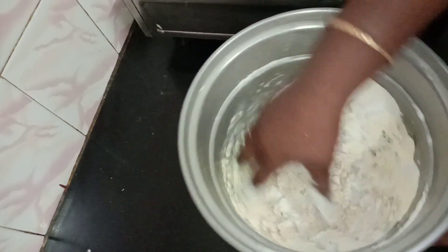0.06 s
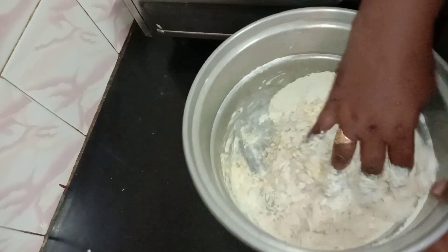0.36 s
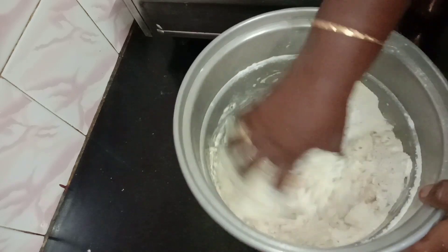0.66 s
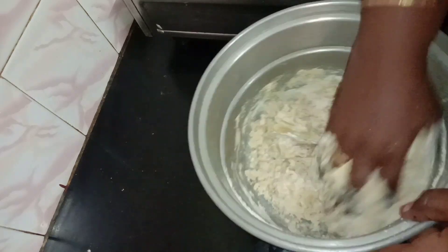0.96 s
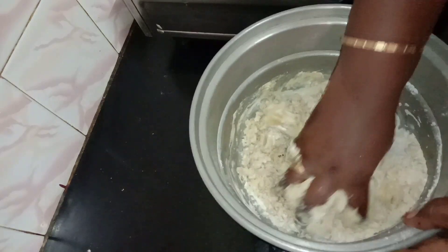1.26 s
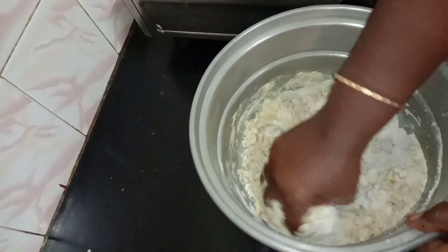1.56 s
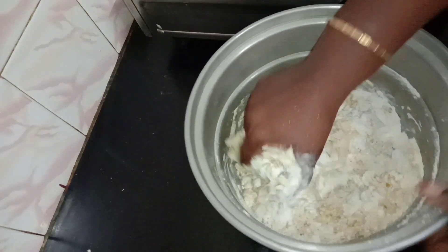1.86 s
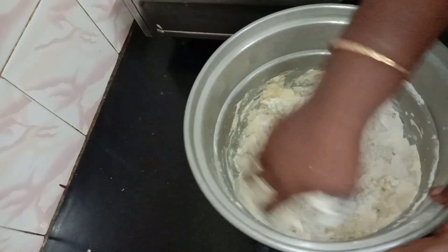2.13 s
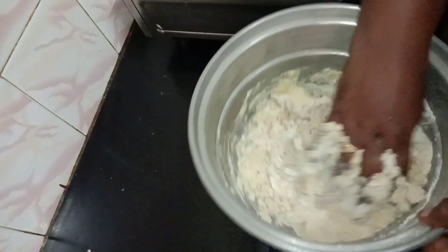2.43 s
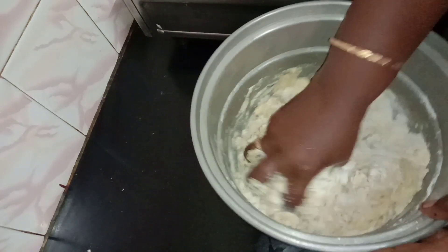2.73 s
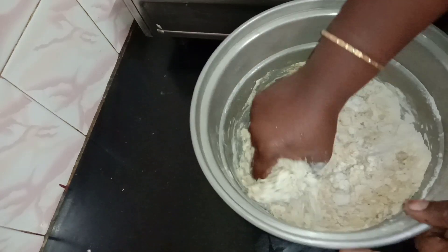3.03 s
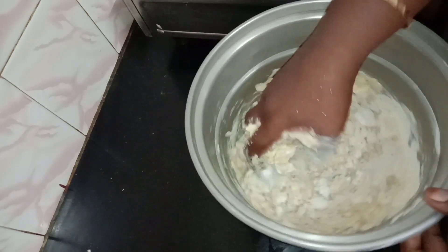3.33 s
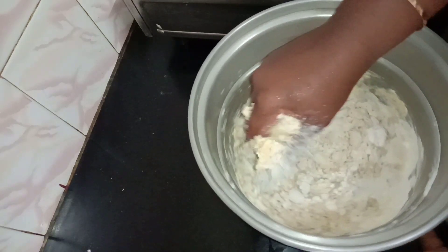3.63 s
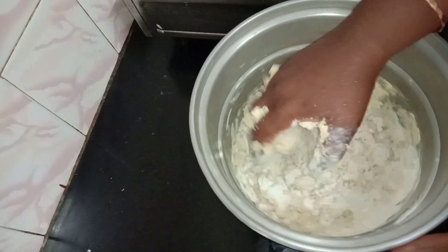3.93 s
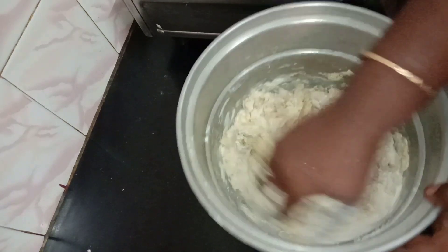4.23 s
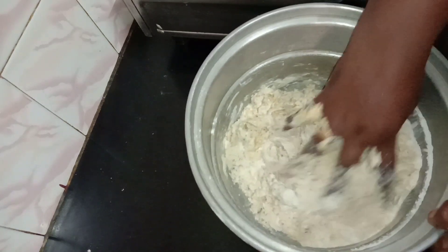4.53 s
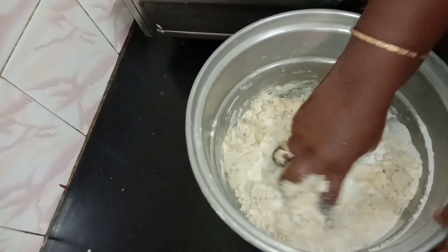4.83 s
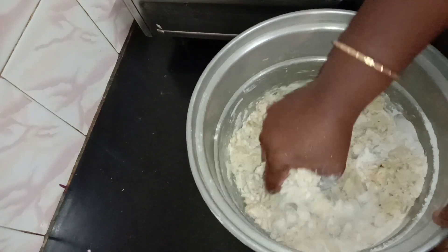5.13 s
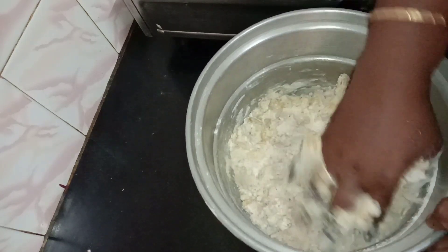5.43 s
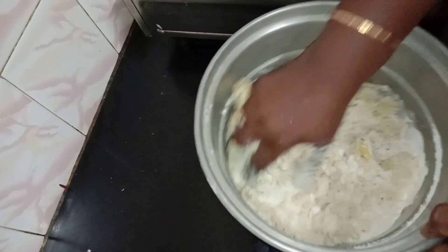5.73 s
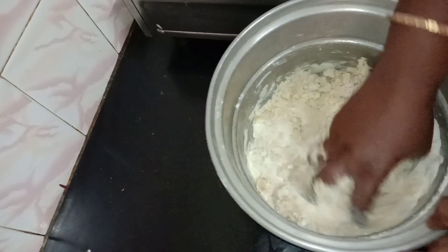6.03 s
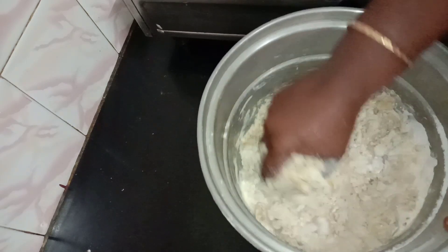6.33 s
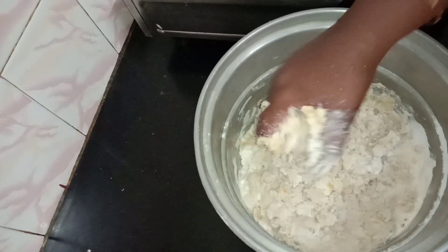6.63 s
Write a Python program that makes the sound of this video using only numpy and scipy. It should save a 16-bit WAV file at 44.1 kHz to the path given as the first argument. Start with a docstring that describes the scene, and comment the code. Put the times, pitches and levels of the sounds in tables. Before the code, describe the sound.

A hand rubs damp flour around a metal pot in gritty swishes, the pot knocking and sliding on a stone counter.

```python
"""A tiled kitchen: a hand rubs damp flour round a wide aluminium pot on a stone counter.
Each stroke drags grains over the metal in a swish, a scrape and a powdery fizz. The pot rings as it
slides and knocks on the stone, crumbs and fingernails tick on its wall, and the palm thumps the dough.
Near the end a bangle clinks on the rim. All is close and in mono, over a low hum and a faint hiss;
about a second in, the sound cuts out for a moment."""
import sys
import numpy as np
from scipy import signal
from scipy.fft import rfft, irfft
from scipy.io import wavfile
from scipy.ndimage import uniform_filter1d

SR = 44100
rng = np.random.default_rng(int(sys.argv[2]) if len(sys.argv) > 2 else 0)


def waveform_to_disk(signal):
    """Save audio, clipped to [-1, 1], as 16-bit WAV at the path in sys.argv[1]."""
    frames = np.transpose(np.atleast_2d(signal))
    scaled = np.clip(frames, -1, 1) * 32767
    samples = np.round(scaled).astype(np.int16)
    wavfile.write(sys.argv[1], SR, samples)


N = 299076

# The ring of the pot. Each row: frequency in Hz, relative level in dB, t60 in seconds.
POT_MODES = [(131, -20, 0.27), (267, -21, 0.076), (326, -11, 0.087), (384, -2, 0.11), (443, -0.5, 0.085),
             (521.2, -3.5, 0.068), (623.8, -2, 0.079), (754, -8, 0.064), (1107, -5.5, 0.037),
             (1228, -4, 0.024), (1406, -8.5, 0.044), (1637, -8.5, 0.074), (1854, -8, 0.12),
             (2105, -9, 0.059), (2468, -2, 0.042), (2748, 3, 0.035), (3400, -2, 0.037), (3720, -6, 0.016),
             (4460, -8.5, 0.066), (6115, -6.5, 0.033), (6700, -33, 0.031), (7210, -11.5, 0.025)]
# The gritty noise of a hard contact. Each row: frequency in Hz, relative level in dB.
GRIT_SPECTRUM = [(200, -25), (800, 0), (2500, 3), (5000, 2), (7500, 0), (9000, -12.5), (12000, -19.5),
                 (15500, -32)]


def amp(db):
    """Decibels to gain."""
    return 10 ** (np.asarray(db) / 20)


def unit(x):
    """Scales to rms 1."""
    return x / np.sqrt(np.mean(x ** 2) + 1e-20)


def curve_at(points, hz):
    """Joins (Hz, value) points by straight lines over log frequency."""
    f, value = np.transpose(points)
    return np.interp(np.log(hz + 1), np.log(f + 1), value)


def add(mix, start_s, sound):
    """Lays a sound into the mix."""
    part = mix[max(round(start_s * SR), 0):][:len(sound)]
    part += sound[:len(part)]


def equalise(x, spectrum):
    """Filters x by a curve of (Hz, dB) points."""
    hz = np.fft.rfftfreq(len(x), 1 / SR)
    return irfft(rfft(x) * amp(curve_at(spectrum, hz)), len(x))


def noise(samples, spectrum):
    """Coloured noise at rms 1."""
    return unit(equalise(rng.standard_normal(samples), spectrum))


def wander(rate_hz):
    """A random drift at rms 1, up to about the given rate."""
    hz = np.fft.rfftfreq(N, 1 / SR)
    return unit(irfft(rfft(rng.standard_normal(N)) / (1 + (hz / rate_hz) ** 2), N))


def grains(per_s, spread_db):
    """Tiny slips of random sign, a few much larger than the rest."""
    size = amp(spread_db * np.minimum(rng.exponential(1, N), 5))
    return unit(size * rng.choice([-1, 1], N) * (rng.random(N) < per_s / SR))


def ring(modes, t, rise_s, force=((1000, 0),)):
    """Decaying modes, each weighted by the force's (Hz, dB) curve, which is flat by default."""
    hz, db, t60 = np.transpose(modes)[:, :, None]
    waves = np.sin(2 * np.pi * (hz * t + rng.random(hz.shape)))
    envelopes = amp(db + curve_at(force, hz)) * np.exp(-np.log(1000) * t / t60)
    return (envelopes * waves).sum(0) * (1 - np.exp(-t / rise_s))


def resonate(slips, body):
    """Each slip sets off the body's ring, scaled to unit energy."""
    return signal.fftconvolve(slips, body / np.linalg.norm(body))[:N]


def hand_strokes():
    """Gains of swish, scrape and fizz: each stroke digs in, swells or eases, and dies away."""
    # Pushes of the hand. Each row: start in seconds, length in seconds, relative end level in dB,
    # swell over the push in dB, scrape offset in dB, powder offset in dB.
    strokes = [(0, 0.14, -38, -4, -9.5, -19), (0.229, 0.14, -43.5, 15, -2, -17),
               (0.44, 0.11, -41, 8.5, -13, -17), (0.58, 0.18, -34, 5.5, -2.5, -12),
               (1.08, 0.19, -43, 3.5, -5, -13), (1.265, 0.2, -39.5, 1, -3, -12.5),
               (1.77, 0.4, -58, -6, -15, -29), (2.071, 0.14, -46, -6, -10, -18),
               (2.222, 0.2, -40, -2, -10, -11), (2.474, 0.18, -41.5, 5, -11, -14),
               (2.62, 0.16, -38.5, 6.5, 0, -12), (4.02, 0.31, -48, 12, -6.5, -19),
               (4.255, 0.148, -31.2, 4.5, -11.2, -7.2), (4.64, 0.14, -44.8, 9.5, -7.5, -15.2),
               (4.78, 0.082, -38.2, 6.5, -3.4, -10.6), (4.98, 0.085, -57.5, -3, -1.5, -29),
               (5.422, 0.27, -31.5, 17.5, -18.5, -13.5), (5.715, 0.14, -49, -4, -4, -15),
               (5.95, 0.15, -40, -10, -3, -20)]
    # The fingers keep working between strokes: relative swish, scrape and fizz levels in dB.
    kneading_db = (-60, -67.5, -89.5)
    attack_s, release_db_per_s = 0.06, 108  # the fingers dig in; the flour settles
    powder_exponent = 1.45  # powder flies only while the hand is fast
    t = np.arange(N) / SR
    power = np.outer(amp(kneading_db) ** 2, np.ones(N))
    for start, length, db, swell_db, scrape_db, powder_db in strokes:
        age = np.maximum(t - start, 0)
        attack = np.sin(np.pi / 2 * np.minimum(age / attack_s, 1)) ** 2
        speed = attack * amp(-release_db_per_s * np.maximum(age - length, 0))
        push = amp(db + swell_db * (np.minimum(age / length, 1) - 1))
        layers = np.array([speed, amp(scrape_db) * speed, amp(powder_db) * speed ** powder_exponent])
        power += (push * layers) ** 2
    return np.sqrt(power)


def rubbing(swish_gain, scrape_gain, fizz_gain):
    """Flour grains slip under trembling finger pressure, and coarse ones ring the wall."""
    # The colours of swishing flour, the scrape on the bottom and dry powder.
    # Each row: frequency in Hz, relative level in dB.
    swish_spectrum = [(1500, -60.5), (3500, -13.5), (5200, 1), (6200, 1), (7600, 0.5), (8600, -6.5),
                      (10500, -25.5)]
    scrape_spectrum = [(120, -27.5), (450, -2), (750, -6), (980, -8.5), (1700, 4), (2900, 4.5), (4400, 6.5),
                       (6000, -3.5), (9000, -37)]
    fizz_spectrum = [(6000, -28), (8500, 2.5), (10000, 3), (12500, -0.5), (14000, -8.5), (15500, 2)]
    # The wall under the fingers. Each row: frequency in Hz, relative level in dB, t60 in seconds.
    wall_modes = [(1704, -6, 0.18), (2500, -0.5, 0.14), (2940, 5.5, 0.075), (3540, 0, 0.13),
                  (4120, 3.5, 0.13), (5700, -16.5, 0.0407)]
    tremble = amp(1.07 * wander(rate_hz=18))
    swish = unit(equalise(grains(per_s=12000, spread_db=1.0), swish_spectrum))
    scrape = unit(equalise(grains(per_s=5000, spread_db=2.6), scrape_spectrum))
    fizz = unit(equalise(grains(per_s=16000, spread_db=2.5), fizz_spectrum))
    flour = amp(-6.5) * swish_gain * swish + amp(-3.0) * scrape_gain * scrape + fizz_gain * fizz
    wall = ring(wall_modes, np.arange(SR // 5) / SR, rise_s=0.00036)
    coarse = amp(-22) * swish_gain * grains(per_s=160, spread_db=6.0)
    return tremble * crumble(flour, patchy_db=2.0) + resonate(coarse, wall)


def crumble(x, patchy_db):
    """Lumps break and re-form: the colour shifts in patches of some 30 ms by 400 Hz."""
    bands = signal.stft(x, SR, nperseg=512)[2]
    patches = uniform_filter1d(rng.standard_normal(bands.shape), size=5, axis=0)
    patches = uniform_filter1d(patches, size=5, axis=1)
    return signal.istft(bands * amp(patchy_db * unit(patches)), SR, nperseg=512)[1][:N]


def knocks():
    """Metal meets stone: grit chatters under the base and the pot rings. Soft landings build slower."""
    # The pot rocks onto the counter. Each row: start in seconds, relative levels of low thud,
    # middle clank and treble clack in dB, chatter time in seconds.
    landings = [(0.0313, -33, -18, -14, 0.0046), (0.0435, -47, -27, -22, 0.0019),
                (0.1883, -40, -38.5, -25.5, 0.003), (0.622, -75.5, -37, -21, 0.0029),
                (1.1352, -20, -23, -21.5, 0.0039), (1.1520, -24, -25.5, -62, 0.0046),
                (3.1677, -17, -22, -36.5, 0.0037), (3.186, -35, -30, -41, 0.012),
                (4.2426, -18, -13, -24.5, 0.0032), (4.2590, -16.5, -24.5, -32, 0.0094),
                (5.9321, -18.5, -17.5, -13.5, 0.0039), (5.9838, -24, -20.5, -14, 0.0041)]
    out, t = np.zeros(N), np.arange(SR // 3) / SR
    for start, thud_db, clank_db, clack_db, chatter_s in landings:
        force = [(620, thud_db), (1150, clank_db), (1700, clank_db - 6.5),
                 (2800, clank_db - 8.5), (6200, clack_db)]
        grit = equalise(noise(len(t), GRIT_SPECTRUM), force)
        age = t / chatter_s
        attack = 1 - np.exp(-age / 0.24)
        decay = np.exp(-age ** 2) + 0.34 * np.exp(-age / 4)
        modes = loaded_pot(detune=0.044, uneven_db=5.0)
        body = ring(modes, t, rise_s=0.11 * chatter_s, force=force)
        add(out, start, amp(-3.5) * grit * attack * decay + amp(-5.5) * body)
    return out


def loaded_pot(detune, uneven_db):
    """Hand and dough load the pot anew at each blow: its modes shift in pitch and strength."""
    hz, db, t60 = np.transpose(POT_MODES)
    shift, gain = rng.uniform(-1.34, 1, (2, len(hz)))
    return np.transpose([hz * (1 + detune * shift), db + uneven_db * gain, t60])


def sliding(push):
    """The base sticks and slips on the stone, and each slip sets the hollow pot ringing."""
    # Skids of the base. Each row: start in seconds, length in seconds, peak drive in dB.
    slides = [(0.471, 0.094, -45.5), (0.817, .15, -51.5), (1.192, 0.33, -49), (2.236, 0.12, -40.3),
              (4.334, 0.15, -51.5), (5.694, 0.092, -47.5), (5.943, 0.34, -44.5)]
    # How hard slips drive the pot. Each row: frequency in Hz, relative level in dB.
    slip_force = [(200, -16), (380, -6), (530, 2), (650, -1.5), (1250, 1.5), (2000, -13)]
    t = np.arange(N) / SR
    speed = amp(-20.5) * push  # every stroke also shakes the pot on its base
    for start, length, db in slides:
        speed += amp(db) * np.sin(np.pi * np.clip((t - start) / length, 0, 1))
    body = ring(POT_MODES, t[:SR // 5], rise_s=0.00042, force=slip_force)
    return resonate(speed * grains(per_s=350, spread_db=1.0), body)


def bangle_clink():
    """The bangle taps the rim, buzzes against it for a moment and rings brightly."""
    # The bangle's ring. Each row: frequency in Hz, relative level in dB, t60 in seconds.
    bangle_modes = [(956, -19.5, 0.12), (1600, -11, 0.054), (2315, -2.5, 0.078), (2480, -12, 0.039),
                    (3166, -20, 0.28), (4320, 3.5, 0.017), (5190, 11.5, 0.025), (5370, -5, 0.026),
                    (5800, -5, 0.032), (6080, -4, 0.028), (6260, -1.5, 0.039), (7230, -8, .04),
                    (7640, 1, 0.032), (7740, 1, .03), (9250, -14, .035), (10870, -12, 0.023),
                    (12600, -19, .015)]
    out, t = np.zeros(N), np.arange(SR // 3) / SR
    buzz = amp(-31) * noise(len(t), GRIT_SPECTRUM) * np.exp(-t / 0.0085)
    chime = amp(-26.5) * ring(bangle_modes, t, rise_s=0.00043)
    add(out, start_s=6.6138, sound=buzz + chime)
    return out


def wall_ticks():
    """Crumbs and fingernails hit the wall: a tiny click and one short ring each."""
    # Small hits. Each row: start in seconds, relative level in dB, pitch in Hz, t60 in seconds.
    ticks = [(0.5163, -35, 5530, 0.022), (2.4918, -33.5, 5970, 0.011), (2.9882, -46, 7300, 0.011),
             (3.954, -43.5, 6600, 0.014), (4.069, -47, 2485, 0.061), (4.146, -43, 5570, 0.024),
             (4.414, -31.5, 1994, 0.029), (4.7156, -43, 5860, 0.051), (5.138, -47, 6700, 0.011),
             (5.376, -51, 3046, 0.11)]
    out, t = np.zeros(N), np.arange(SR // 6) / SR
    for start, db, hz, t60 in ticks:
        click = noise(len(t), [(hz / 4, -20), (hz, 0), (hz * 2, -26), (hz * 4, -45)])
        tink = ring([(hz, db + 2.5, t60)], t, rise_s=0.0014)
        add(out, start, amp(db - 6.5) * click * np.exp(-t / 0.0049) + tink)
    return out


def low_thumps():
    """The palm on the dough, and at 4.244 s the bass of the pot knocking on the counter."""
    # Soft low thumps. Each row: start in seconds, relative level in dB, pitch in Hz.
    thumps = [(0.176, -33.5, 98), (3.265, -37.5, 108), (4.244, -34, 263), (4.27, -28.5, 94),
              (6.28, -44, 140.7)]
    out, t = np.zeros(N), np.arange(SR // 3) / SR
    peak_s = 0.015
    envelope = t / peak_s * np.exp(1 - t / peak_s)
    for start, db, hz in thumps:
        add(out, start, amp(db - 4.5) * envelope * np.sin(2 * np.pi * hz * t))
    return out


def kitchen_reverb(x):
    """Dense reflections from the tiles, each band dying at its own speed."""
    # The room's decay. Each row: frequency in Hz, t60 in seconds.
    decay_times = [(100, 1.67), (450, 0.6), (1200, 0.66), (3000, 0.56), (7000, 0.33), (14000, 0.45)]
    # The colour of the reflections. Each row: frequency in Hz, level in dB.
    wet_spectrum = [(50, -11.5), (100, -2), (450, -1.5), (1200, 0), (3000, -6.5), (7000, -7.5), (14000, -6)]
    hz, t, bands = signal.stft(unit(rng.standard_normal(SR)), SR, nperseg=256)
    decay_rate = np.log(1000) / curve_at(decay_times, hz)[:, None]
    envelopes = np.exp(-decay_rate * t) * np.sqrt(2 * decay_rate / SR)  # equal energy per band
    colour = amp(curve_at(wet_spectrum, hz))[:, None]
    tail = signal.istft(bands * envelopes * colour, SR, nperseg=256)[1][:SR]
    fade_in = np.clip(np.arange(SR) / SR / 0.0019, 0, 1)
    return signal.fftconvolve(x, tail * fade_in)[:N]


def room_noise():
    """A low wavering hum under a faint hiss."""
    # The two colours of the room tone. Each row: frequency in Hz, relative level in dB.
    hum_spectrum = [(25, -26), (60, -13), (74, -18), (88, 6), (108, 2), (140, 4), (230, -9), (420, -4.5),
                    (600, -13), (750, -5), (950, -11.5), (1350, -6), (1900, -21), (4500, -27),
                    (9000, -55.5)]
    hiss_spectrum = [(1500, -26), (3500, -16), (5500, 6), (7800, 7), (9000, -15.5), (11000, -7.5),
                     (15500, -29)]
    hum = amp(-54.5) * noise(N, hum_spectrum) * amp(1.84 * wander(rate_hz=6.1))
    return hum + amp(-69.5) * noise(N, hiss_spectrum)


def scene():
    """Sharp blows wake the room; the rubbing is heard mostly direct."""
    swish_gain, scrape_gain, fizz_gain = hand_strokes()
    blows = knocks() + bangle_clink() + wall_ticks()
    soft = rubbing(swish_gain, scrape_gain, fizz_gain) + sliding(swish_gain) + low_thumps()
    mono = blows + soft + kitchen_reverb(blows + amp(-7.0) * soft) + room_noise()
    return np.array([mono, mono])


def record(dry):
    """A phone microphone with ringing peaks, weak bass and a band limit; the sound cuts out once."""
    # Peaks and a notch of the microphone port. Each row: centre in Hz, width in Hz, gain in dB.
    port_bands = [(1240, 73, 8.5), (6106, 620, 5.5), (6620, 186, -6.5), (7270, 790, 8.5), (15100, 600, 6.5)]
    low_cut_hz, high_cut_hz = 44, 15560
    mute_from_s, mute_to_s, fade_in_s = 0.99, 1.088, 0.012
    hz, t = abs(np.fft.fftfreq(4096, 1 / SR)), np.arange(N) / SR
    port_db = sum(db * np.exp(-((hz - centre) / width) ** 2) for centre, width, db in port_bands)
    log_response = np.conj(signal.hilbert(np.log(amp(port_db))))  # causal: rings only after a click
    port = np.fft.ifft(np.exp(log_response)).real
    heard = signal.oaconvolve(dry, port[None], axes=1)[:, :N]
    heard = signal.sosfilt(signal.butter(2, low_cut_hz, "high", fs=SR, output="sos"), heard)
    gate = np.maximum(t < mute_from_s, np.clip((t - mute_to_s) / fade_in_s, 0, 1))
    lowpass = signal.firwin(511, high_cut_hz, window=("kaiser", 9), fs=SR)
    return signal.oaconvolve(heard * gate, lowpass[None], "same")


dry = scene()
out = record(dry)
waveform_to_disk(out)
```